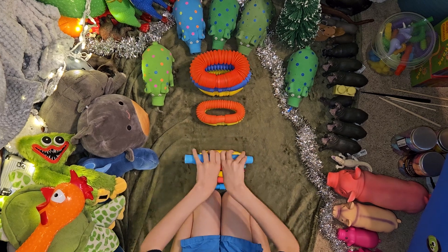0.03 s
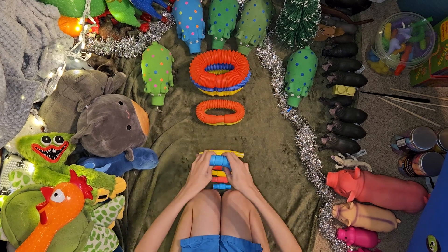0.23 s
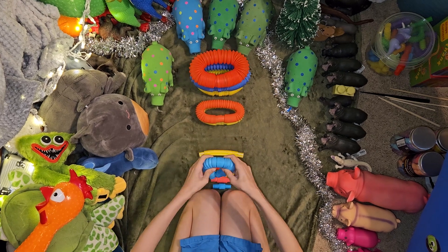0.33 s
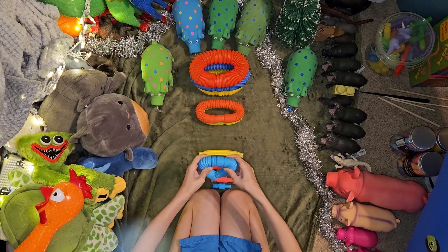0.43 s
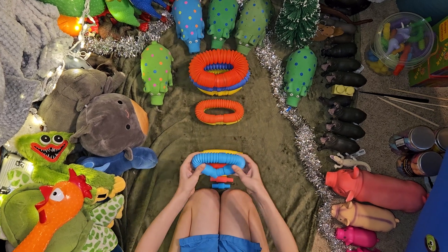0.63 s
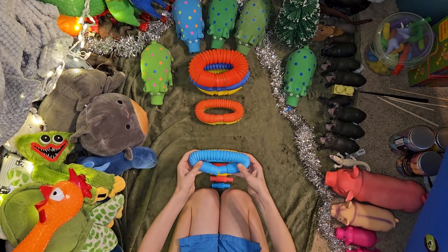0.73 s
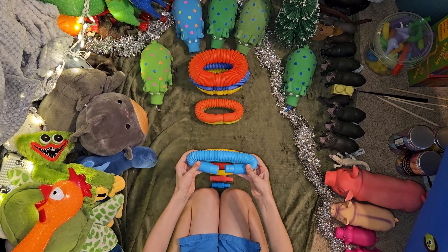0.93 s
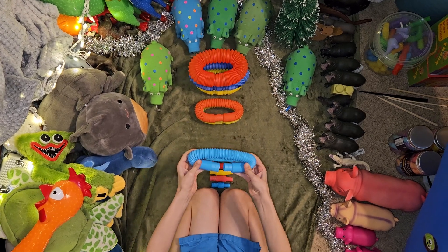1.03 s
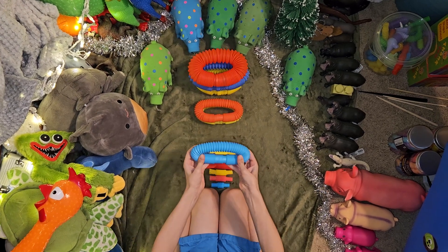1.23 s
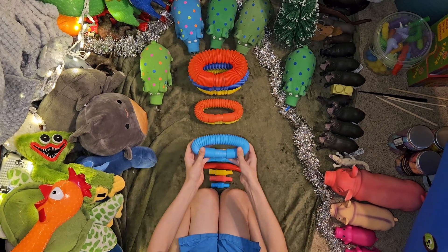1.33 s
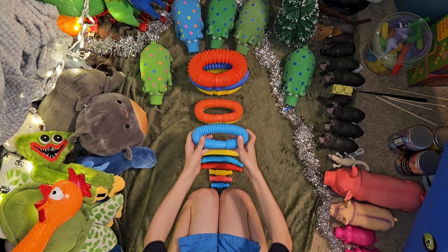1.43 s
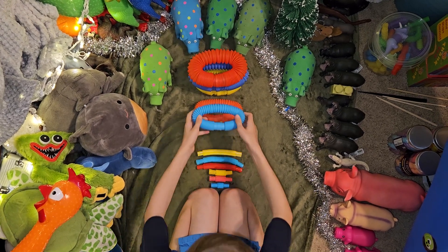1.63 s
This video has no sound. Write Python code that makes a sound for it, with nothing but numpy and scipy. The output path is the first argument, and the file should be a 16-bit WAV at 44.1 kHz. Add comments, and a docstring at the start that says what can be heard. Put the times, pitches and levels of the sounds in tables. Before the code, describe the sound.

Quick cracks and pops of a ribbed plastic tube being stretched, followed by faint ticks.

```python
"""Pop tube pulled open

A ribbed plastic tube is stretched by hand in a small carpeted room. Its folds snap out one after
another: each cracks in the wall, thumps, and rings the air column, whose pitch falls as the tube
grows longer. Then the bent tube ticks softly in the hands, over a low room hum."""
import sys
import numpy as np
from scipy import signal
from scipy.fft import rfft, irfft
from scipy.io import wavfile

SR = 44100
rng = np.random.default_rng(int(sys.argv[2]) if len(sys.argv) > 2 else 0)


def int16_out(signal):
    """Quantize to a 16-bit WAV file."""
    q = np.round(np.clip(np.atleast_2d(signal).T, -1, 1) * 32767)
    wavfile.write(sys.argv[1], SR, q.astype(np.int16))


N = 74970
TIME = np.arange(N) / SR
FREQS = np.fft.rfftfreq(N, 1 / SR)

# folds snapping open: t/s, then relative level/dB of crack, of fundamental and thump, of overtones
SNAPS = [(0.1886, -17, -27.5, -21.5), (.2055, -19.5, -29, -24), (.2212, -12.5, -28.5, -22),
         (.2328, -25, -25.5, -18.5), (.2425, -17, -32, -24), (.2595, -19, -19, -13.5),
         (.2845, -14.5, -20.5, -10.5), (.3062, -19.5, -30.5, -22.5), (.3192, -17.5, -25, -13.5),
         (0.3601, -14.5, -18.5, -18), (0.4084, -17.5, -23, -23.5), (.4508, -9, -16, -23.5),
         (0.4611, -17, -29.5, -29.5), (.4678, -16.5, -15.5, -20.5), (0.4943, -20, -23.5, -24.5),
         (0.5144, -8, -22.5, -19.5), (0.5326, -11, -20, -20.5), (0.5391, -9.5, -16.5, -26.5),
         (0.5477, -8, -23, -25.5), (0.554, -25, -19.5, -19.5), (.5590, -13, -20.5, -22),
         (0.566, -11, -20.5, -20.5), (0.5783, -18, -19.5, -15), (0.5975, -13.5, -22, -16),
         (.6720, -8, -20, -16), (0.6869, -17, -15.5, -15.5), (0.6998, -8, -17, -13),
         (.7100, -11.5, -14, -21), (.7160, -11, -22.5, -12), (0.7896, -11.5, -20.5, -22),
         (0.7925, -10, -22.5, -19), (0.7989, -16.5, -19, -14), (.8050, -14.5, -26, -12),
         (0.8299, -5, -25, -21), (0.8387, -14.5, -19, -10)]


def wall_cracks():
    """Each fold flips with a sharp crack and a short shiver; some set the wall ringing."""
    # tone of the crack: f/Hz, relative level/dB, left minus right/dB
    crack_tone = [(99, -15.5, 4.5), (303, -8, 0), (740, 3.5, 7.5), (1050, -3, 1), (1493, 6.5, 5),
                  (2800, 5.5, -6.5), (4270, 7, -8.5), (5840, -1, -1), (8530, -2.5, -2), (10330, -27, 0),
                  (11600, -5.5, 0), (15500, -16.5, 3.5)]
    # snaps that ring the wall: t/s, level/dB
    ringing_snaps = [(.2600, -37), (.2850, -21.5), (0.5415, -23.5), (0.7905, -8), (0.792, -9.5),
                     (0.833, -17.5)]
    attack_s, decay_s, shiver_s = 0.00049, 0.0021, 0.017
    times, crack_db, _, _ = np.transpose(SNAPS)
    hits = clicks(times, crack_db)
    snap = fade(hits, decay_s) - fade(hits, attack_s)
    shiver = from_db(-17) * fade(hits, shiver_s)
    cracks = from_db(-3) * crackle(snap + shiver, crack_tone)
    ping = ring(clicks(*np.transpose(ringing_snaps)), hz=4146, t60=0.011)
    return cracks + ping * panned(-3.5)


def air_column():
    """Each snap rings the air inside: a hollow note that drops as the tube lengthens."""
    # lowest resonance of the column: t/s, f/Hz
    glide = [(.19, 743.6), (.26, 702.6), (.325, 680), (.41, 639), (.47, 596), (.57, 527.6), (.68, 487),
             (.73, 477.3), (.80, 461), (.85, 448), (.92, 413)]
    # multiple of the pitch, short-tube gain/dB, long-tube gain/dB, t60/s, left minus right/dB
    overtones = [(2.0, -15, -19.5, 0.043, 1), (3.02, -6, -6, 0.056, -3.5), (5.1, -22, -13, 0.045, 0.5)]
    times, _, fundamental_db, overtone_db = np.transpose(SNAPS)
    pitch = np.interp(TIME, *np.transpose(glide))
    note = ring(clicks(times, fundamental_db), pitch, t60=0.067)
    for multiple, short_db, long_db, t60, pan_db in overtones:
        hits = clicks(times, overtone_db + np.linspace(short_db, long_db, len(times)))
        note = note + ring(hits, multiple * pitch, t60) * panned(pan_db)
    return note


def wall_thumps():
    """Each snap thumps the wall, with more body as the tube opens."""
    # wall modes: f/Hz, short-tube gain/dB, long-tube gain/dB, t60/s
    modes = [(140.7, -41, -19.5, 0.042), (310, -15, -20, 0.041), (620, -28.5, 0, 0.071),
             (691, -27.5, -7, 0.068), (848, -22.5, -33, 0.048)]
    times, _, thump_db, _ = np.transpose(SNAPS)
    thumps = np.zeros(N)
    for hz, short_db, long_db, t60 in modes:
        hits = clicks(times, thump_db + np.linspace(short_db, long_db, len(times)))
        thumps += ring(hits, hz, t60)
    return thumps


def handling_ticks():
    """The plastic gives small dry ticks as the tube is bent and held."""
    # ticks: t/s, level/dB
    ticks = [(1.131, -43), (1.1405, -40), (1.146, -48.5), (1.151, -42.5), (1.157, -40), (1.37, -56),
             (1.474, -52)]
    # tone of a tick: f/Hz, relative level/dB, left minus right/dB
    tick_tone = [(200, -2, 5), (1000, 1.5, 3), (3020, 4, -7.5), (4300, 0.5, -15), (6060, -18, -5),
                 (8600, -4.5, -6), (9800, -27, 3), (12800, -4, -3), (16000, -10.5, 6)]
    envelope = fade(clicks(*np.transpose(ticks)), seconds=0.0054)
    return crackle(envelope, tick_tone)


def crackle(envelope, tone):
    """Noise bursts for the crackling plastic, narrow in the lows and wide in the highs."""
    # stereo image: f/Hz, left-right likeness
    image = [(700, 0.89), (1500, 0.28), (4000, 0.16), (12000, .3)]
    return colour(envelope * stereo_noise(at_hz(image, FREQS)), tone)


def room_reverb(x):
    """The room returns a near reflection and a diffuse tail that dies band by band."""
    # near reflection: delay/s, left level/dB, right level/dB
    reflections = [(.0085, -17, -17.5)]
    # tail: f/Hz, relative level/dB, t60/s, left-right likeness
    tail = [(152.1, -11, 0.18, 1), (480, -3.5, 0.15, 0.81), (1406, -14, 0.37, 0.31),
            (4040, -8.5, 0.31, 0.089), (8040, -9, 0.26, 0.12), (13900, -6, 0.18, .1)]
    build_up_s = 0.0049
    onset = np.clip(TIME / build_up_s - .5, 0, 1)
    edges_hz = np.geomspace(60, 18000, 13)
    noise = rfft(stereo_noise(at_hz(tail, FREQS, column=3)))
    response = np.zeros((2, N))
    for low, high in zip(edges_hz, edges_hz[1:]):
        centre = np.sqrt(low * high)
        decay = from_db(-60 * TIME / at_hz(tail, centre, column=2))
        band = irfft(noise * ((FREQS >= low) & (FREQS < high)), N) * onset * decay
        unity_gain = np.sqrt(4 * (high - low) / SR / np.sum(band ** 2))
        response += band * unity_gain * from_db(at_hz(tail, centre))
    delay, left_db, right_db = np.transpose(reflections)
    response += [clicks(delay, left_db), clicks(delay, right_db)]
    return signal.fftconvolve(x, response, axes=1)[:, :N]


def room_tone():
    """A steady bed of dark noise with a few faint, wavering hum tones."""
    # tone of the bed: f/Hz, relative level/dB
    bed_tone = [(15, -16.5), (25, -4.5), (70, -1.5), (102, -4.5), (137, 3), (301, -6.5), (335, -4.5),
                (384, -1.5), (476, -7), (936, -5), (1190, -11.5), (3520, -17.5), (9840, -41.5),
                (16000, -41.5)]
    # stereo image of the bed: f/Hz, left-right likeness
    image = [(100, 0.99), (700, 0.48), (2000, 0.13), (8000, 0.059)]
    # narrow noise bands of the hum: f/Hz, level/dB, width/Hz
    hum_bands = [(139, -67.5, 5.1), (403.5, -61.5, 14.8), (431.6, -65, 12), (920, -68, 7.7)]
    noise = stereo_noise(at_hz(image, FREQS))
    bed = irfft(rfft(noise) * from_db(at_hz(bed_tone, FREQS)), N)
    hum = np.zeros(N)
    for hz, db, width in hum_bands:
        peak = 1 / (1 + (2 * (FREQS - hz) / width) ** 2)
        band = irfft(rfft(rng.standard_normal(N)) * peak, N)
        hum += from_db(db) * unit_rms(band)
    return from_db(-52.5) * unit_rms(bed) + hum


def from_db(db):
    return 10 ** (np.asarray(db) / 20)


def unit_rms(x):
    return x / np.sqrt(np.mean(x ** 2) + 1e-20)


def panned(db):
    """Left and right gains, with the left louder by db."""
    return from_db(np.array([[.5], [-.5]]) * db)


def at_hz(points, hz, column=1):
    """One column of a table, read on a log-frequency axis."""
    table = np.array(points)
    return np.interp(np.log(np.maximum(hz, 1)), np.log(table[:, 0]), table[:, column])


def clicks(times, db):
    """A train of one-sample clicks."""
    out = np.zeros(N)
    np.add.at(out, np.round(np.asarray(times) * SR).astype(int), from_db(db))
    return out


def fade(x, seconds):
    """Every click dies away with this time constant."""
    return signal.lfilter([1], [1, -np.exp(-1 / (seconds * SR))], x + 1e-18)


def ring(x, hz, t60):
    """Every click sets a sine ringing; its pitch may glide."""
    phasor = np.exp(2j * np.pi * np.cumsum(hz * np.ones(N)) / SR)
    return (phasor * fade(x / phasor, t60 / np.log(1000))).real


def colour(x, tone, size=4096):
    """Stereo EQ: a curve at unit power gain, panned frequency by frequency."""
    hz = np.fft.rfftfreq(size, 1 / SR)
    gain = unit_rms(from_db(at_hz(tone, hz))) * panned(at_hz(tone, hz, column=2))
    cepstrum = irfft(np.log(gain))
    # minimum phase keeps the attacks free of pre-ringing
    cepstrum[:, 1:size // 2] *= 2
    cepstrum[:, size // 2 + 1:] = 0
    response = irfft(np.exp(rfft(cepstrum)))
    return signal.fftconvolve(x, response, axes=1)[:, :N]


def stereo_noise(likeness):
    """White noise with a likeness per frequency: 1 is mono, 0 is fully wide."""
    mid, side = rfft(rng.standard_normal((2, N)))
    likeness = np.clip(likeness, 0, 1)
    mid *= np.sqrt((1 + likeness) / 2)
    side *= np.sqrt((1 - likeness) / 2)
    return irfft([mid + side, mid - side], N)


def scene():
    """The tube in its room; being narrow, it radiates little bass."""
    low_cut = signal.butter(2, 103, "high", fs=SR, output="sos")
    tube = signal.sosfilt(low_cut, wall_cracks() + air_column() + wall_thumps() + handling_ticks())
    return tube + room_reverb(tube) + room_tone()


def record(dry):
    """Peaks clip at full scale, then a steep low-pass trims the very top."""
    high_cut = signal.ellip(10, .2, 80, 16300, fs=SR, output="sos")
    return signal.sosfilt(high_cut, np.clip(dry, -1, 1))


dry = scene()
out = record(dry)
int16_out(out)
```